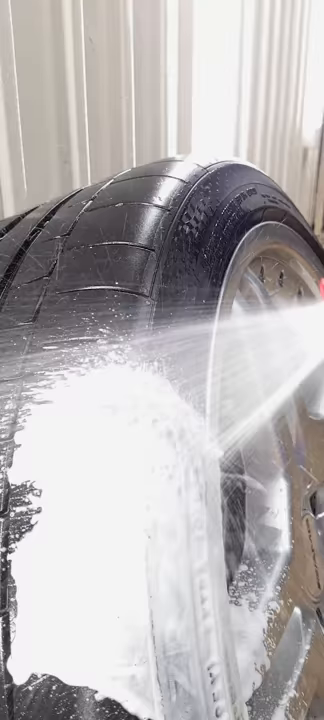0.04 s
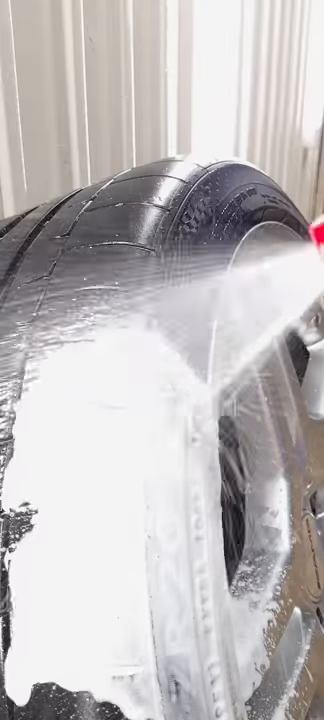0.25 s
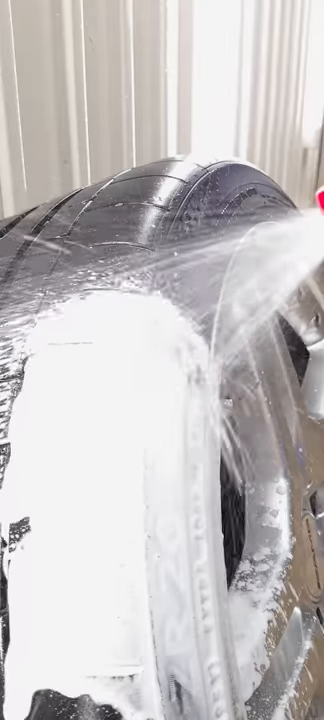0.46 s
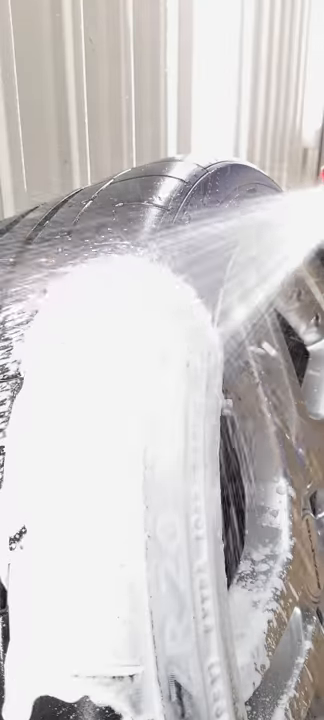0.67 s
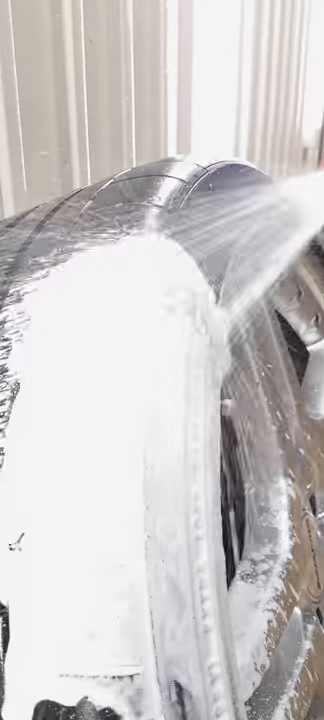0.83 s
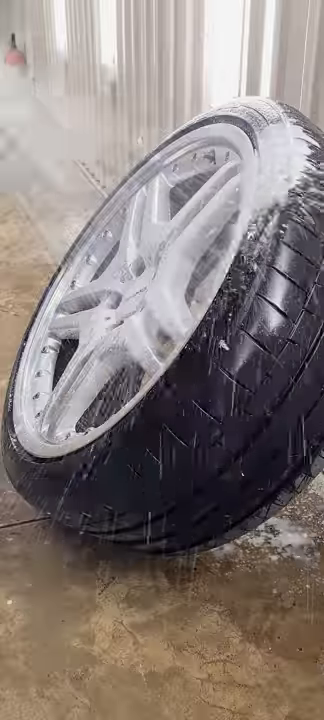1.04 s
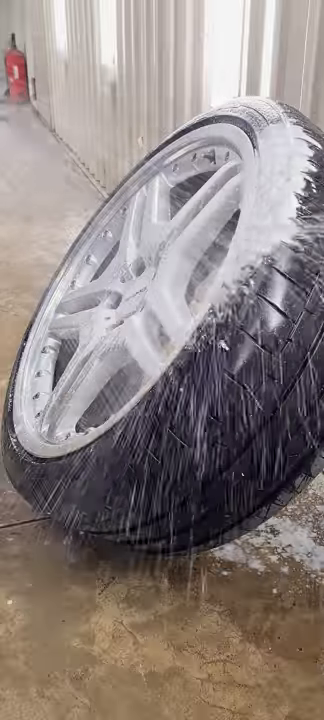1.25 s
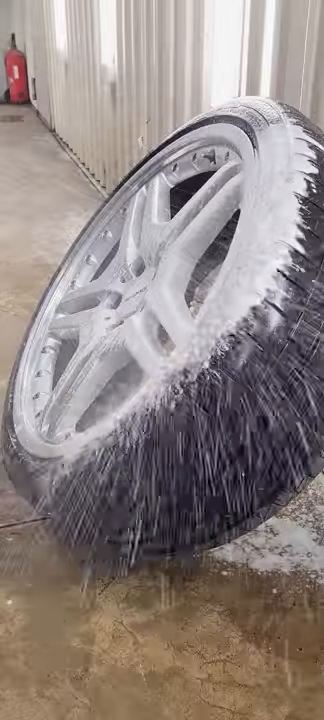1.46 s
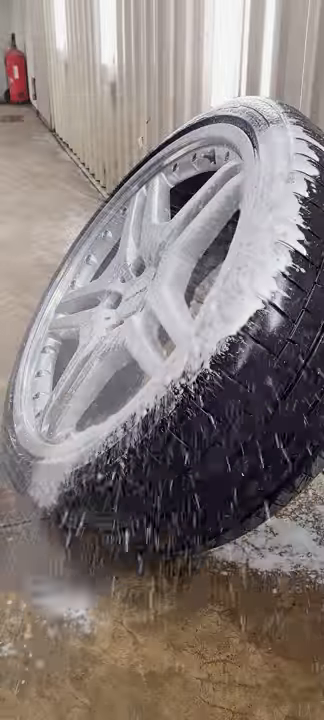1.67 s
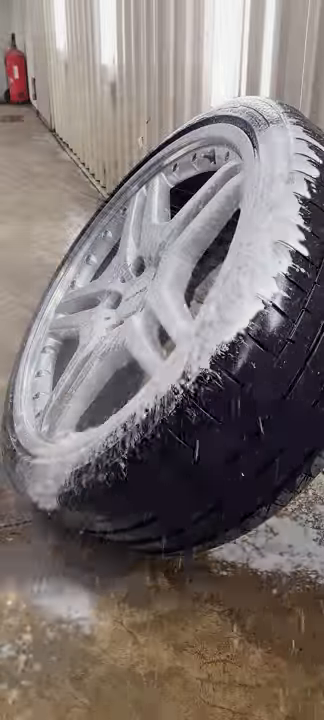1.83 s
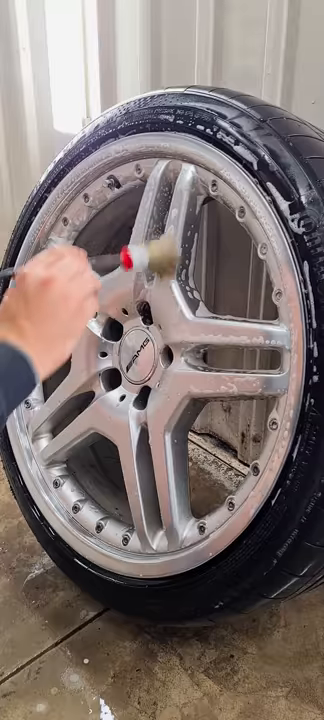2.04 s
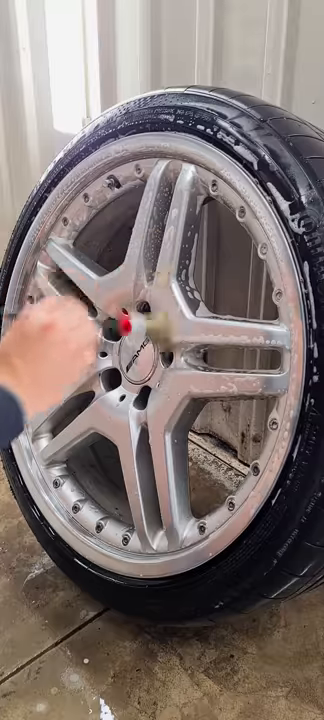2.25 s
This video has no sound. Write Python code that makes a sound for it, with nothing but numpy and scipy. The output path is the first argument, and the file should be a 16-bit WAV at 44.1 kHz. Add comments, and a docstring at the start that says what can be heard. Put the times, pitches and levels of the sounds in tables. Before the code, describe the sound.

A pressurised foam sprayer hisses onto a car wheel in a garage. After a faint hiss, the close jet starts at 0.1 seconds, sputtering and drumming on the tyre, with a sharp splash near 1 second. It then cuts to a smoother, more distant spray pattering on the rim, easing around 1.8 seconds. From 2 seconds a small brush quietly scrubs wet spokes. A faint low rumble lies underneath.

```python
"""A foam lance sprays a car wheel in a garage, in three short scenes joined by hard cuts.
After a faint hiss, the jet sputters close up: turbulence and droplets hiss, foam drums on the tyre,
and sliding reflections comb-filter the sound. From further off the jet then sweeps smoothly over
the rim and excites its resonances. Thick slugs of foam splash in both passes. Last, a small brush
scrubs the wet spokes over the low rumble that lies under all three scenes."""
import sys
import numpy as np
from scipy import signal
from scipy.fft import rfft, irfft
from scipy.io import wavfile
from scipy.ndimage import map_coordinates

SR = 44100
rng = np.random.default_rng(int(sys.argv[2]) if len(sys.argv) > 2 else 0)


def to_wav(sig):
    """Store sig (one row per channel, or 1-D mono) as 16-bit WAV at the path in sys.argv[1].

    Samples outside -1..1 are clipped; the rate is SR.
    """
    pcm = np.clip(np.atleast_2d(sig), -1, 1) * 32767
    pcm = np.round(pcm).astype(np.int16)
    wavfile.write(sys.argv[1], SR, pcm.T)  # frames by channels


N = 101429

TREAD_S, RIM_S, BRUSH_S = 0.1154, 1.071, 2.028  # where the scenes start
GARAGE_T60_S, WHEEL_T60_S = 0.12, 0.045  # decay of sound scattered by the walls and around the wheel


def undb(db):
    """Amplitude grows tenfold every 20 dB."""
    return 10 ** (np.asarray(db) / 20)


def unit(x):
    """Normalisation to unit RMS."""
    return x / np.sqrt(np.mean(x ** 2))


def clock():
    """Sample times in seconds."""
    return np.arange(N) / SR


def curve(rows, axis=1):
    """Linear interpolation of one column in time."""
    rows = np.array(rows)
    return np.interp(clock(), rows[:, 0], rows[:, axis])


def between(start_s, end_s, fade_s=0.0084):
    """A time window with short linear fades."""
    return np.clip((clock() - start_s) / fade_s + .5, 0, 1) * np.clip((end_s - clock()) / fade_s + .5, 0, 1)


def bell(middle_s, half_s):
    """A Gaussian swell as the jet passes a spot."""
    return np.exp(-((clock() - middle_s) / half_s) ** 2)


def slide(ends, span_s):
    """Accelerated motion between two values: the lance gathers speed through a pass."""
    return ends[0] + (ends[1] - ends[0]) * np.interp(clock(), span_s, (0, 1)) ** 1.5


def walk(rate_hz):
    """Smooth random fluctuation with a spread near 1."""
    return map_coordinates(rng.standard_normal(4096), [clock() * rate_hz], order=2, mode="wrap")


def colour(x, rows, axis=1):
    """Spectral shaping by gains interpolated over log frequency."""
    rows, hz = np.array(rows), np.fft.rfftfreq(2 * N, 1 / SR)
    gain_db = np.interp(np.log(hz + 1), np.log(rows[:, 0]), rows[:, axis])
    return irfft(rfft(x, 2 * N) * undb(gain_db))[..., :N]


def glide(x, ratio):
    """Resampling scales all frequencies by a moving ratio."""
    return map_coordinates(x, [np.cumsum(ratio)], order=5, mode="mirror")


def late(x, delay_ms):
    """Propagation delay, which may vary in time."""
    return map_coordinates(x, [np.arange(N) - delay_ms * SR / 1000], order=3, mode="mirror")


def ring(x, modes):
    """Modal superposition: damped resonances add with alternating sign."""
    return sum((-1) ** k * undb(db) * signal.lfilter(*signal.iirpeak(hz, hz / width, SR), x)
               for k, (hz, width, db) in enumerate(modes))


def nearby(x, right_lag_ms, echoes, span_s):
    """Comb filtering: direct sound and sliding reflections interfere at two microphone ports."""
    def port(direct, rows):
        reflected = sum(gain * late(direct, slide((start, end), span_s)) for start, end, gain in rows)
        return (direct + reflected) / np.sqrt(1 + sum(gain ** 2 for _, _, gain in rows))
    right = late(x, np.interp(clock(), span_s, right_lag_ms))
    return np.array([port(x, echoes[0]), port(right, echoes[1])])


def hollow(ports):
    """Interference with a very short reflection hollows the hiss at the tyre's shoulder."""
    gains = [peak * bell(middle_s=0.74, half_s=0.2) for peak in (0.08, 0.34)]
    return np.array([(x + g * late(x, delay_ms=0.38)) / np.hypot(1, g) for x, g in zip(ports, gains)])


def scatter(x, t60_s, count=5):
    """A diffuse field drifts as the source moves; the ports are coherent only in the bass."""
    t = np.arange(SR // 3) / SR
    tails = rng.standard_normal((count, 2, len(t))) * undb(-60 * t / t60_s)
    echoes = sum(signal.fftconvolve(late(x, 0.209 * walk(rate_hz=3))[None], tail, axes=1)[:, :N]
                 for tail in tails)
    mid, side = echoes / np.linalg.norm(tails)
    side = colour(side, [(200, -35), (700, 3), (1400, 0.5)])
    return np.array([mid + side, mid - side])


def spray(drops, spread_db, flutter_db, flutter_hz, drops_per_s=2500):
    """Turbulent noise plus shot noise of uneven impacts, fluttering as the stream breaks up."""
    sizes = rng.choice([-1, 1], N) * undb(spread_db * np.minimum(rng.exponential(size=N), 3.5))
    impacts = (rng.random(N) < drops_per_s / SR) * sizes
    stream = rng.standard_normal(N) + drops * unit(impacts)
    return unit(stream * undb(flutter_db * walk(flutter_hz)))


def cloud(spectrum):
    """Widely spread droplets give a hiss that is incoherent between the ports."""
    ports = [spray(drops=0.66, spread_db=2.0, flutter_db=-4.5, flutter_hz=310) for _ in range(2)]
    return np.array([unit(colour(port, spectrum)) for port in ports])


def background():
    """Shaped random noise: room air, a faint opening hiss and a rumble that sinks during the spraying."""
    # spectra of the three noises: frequency_hz, gain_db
    faint_spectrum = [(200, -11), (1000, -6), (2500, -0.5), (5500, 1.5), (8000, -1.5), (15000, 2.5)]
    rumble_spectrum = [(15, -2.5), (28, -5.5), (40, -2), (48, -8), (60, 4.5), (85, -5.5), (125, -17.5),
                       (200, -33), (600, -46)]
    air_spectrum = [(60, 14), (150, -14), (210, 2.5), (330, 2), (600, -3), (1500, -10.5), (4000, -20.5),
                    (15000, -40)]
    # envelopes of hiss and rumble: time_s, level_db
    faint_levels = [(0, -57), (.06, -63.5), (.11, -60)]
    rumble_levels = [(0, -60.5), (.1, -56), (.15, -63.5), (.8, -65), (1.3, -70), (1.75, -68.5), (2, -63),
                     (2.3, -63.5)]
    stereo_noise = lambda width: rng.standard_normal(N) + width * rng.standard_normal((2, N))
    faint = unit(colour(rng.standard_normal((2, N)), faint_spectrum)) * undb(curve(faint_levels))
    rumble = unit(colour(stereo_noise(0.099), rumble_spectrum)) * undb(curve(rumble_levels))
    air = unit(colour(stereo_noise(0.43), air_spectrum)) * undb(-69.5)
    return faint * (clock() < TREAD_S) + rumble + air


def brush():
    """Friction noise: wet bristles flick over the spokes, louder under more pressure."""
    # noise of the bristles: frequency_hz, gain_db
    spectrum = [(500, 6), (1200, -1.5), (3000, 1.5), (5300, -3.5), (8000, -7.5), (15000, -1)]
    # pressure on the spokes: time_s, relative_level_db
    scrub = [(2.03, -70), (2.055, -75.5), (2.1, -74.5), (2.125, -71.5), (2.15, -76), (2.18, -73),
             (2.194, -65), (2.21, -69), (2.235, -73.5), (2.3, -72)]
    flicks = spray(drops=0.81, spread_db=6, flutter_db=1.5, flutter_hz=200)
    bristles = unit(colour(flicks, spectrum)) * undb(curve(scrub) - 6)
    return (bristles + scatter(undb(8.5) * bristles, WHEEL_T60_S)) * (clock() > BRUSH_S)


def splashes(attack_s=0.002, decay_s=0.016):
    """Impact transients: each slug of foam bursts into noise that decays exponentially."""
    # slugs striking the wheel: start_s, level_db
    slugs = [(0.346, -45), (1.015, -33.5), (1.03, -39.5), (1.538, -39)]
    # noise of a splash: frequency_hz, gain_db
    spectrum = [(200, -42), (2600, -0.5), (4400, 4.5), (6000, -13), (12000, -9)]
    burst = lambda age: np.clip(age / attack_s, 0, 1) * np.exp(-np.abs(age) / decay_s)
    return cloud(spectrum) * sum(undb(db) * burst(clock() - start_s) for start_s, db in slugs)


def foam_on_rim():
    """At a distance the diffuse field dominates the hiss; drops excite the modes of rim and spokes."""
    # strength of the sweeping jet: time_s, relative_hiss_db, relative_patter_db
    sweep = [(1.08, -41, -58), (1.13, -39.5, -58), (1.25, -40.5, -57), (1.47, -39.5, -57),
             (1.6, -36.5, -60), (1.715, -40.5, -61.5), (1.76, -46.5, -67), (1.83, -46, -64.5),
             (1.885, -48.5, -66.5), (1.96, -44.5, -62), (2.024, -39.5, -54)]
    # hiss on the rim: frequency_hz, gain_db
    spectrum = [(600, -23), (1250, -8), (1600, -3), (2600, -1), (3700, 1), (5000, -1.5), (9000, -3.5),
                (12000, 3), (15000, -0.5)]
    # resonances of the wheel: frequency_hz, bandwidth_hz, gain_db
    rim_modes = [(296, 115, -11.5), (432, 113, -5), (725, 240, -4.5), (927, 64, 3), (1184, 61, -1)]
    spoke_modes = [(1555, 47, 9), (1830, 63, -10)]
    # near reflections, left port then right: start_delay_ms, end_delay_ms, gain
    echoes = ([(3.45, 2.52, 0.42), (1.02, 1.03, 0.2)], [(2.83, 2.25, 0.65), (1.22, 1.4, 0.15)])
    span_s = (RIM_S, BRUSH_S)
    hiss_gain = undb(curve(sweep) - 1.5)
    hiss = colour(spray(drops=0.85, spread_db=6.5, flutter_db=0.4, flutter_hz=301.6), spectrum)
    hiss = unit(hiss) * hiss_gain
    patter = ring(spray(drops=0.87, spread_db=3.5, flutter_db=2.0, flutter_hz=57.55), rim_modes)
    patter = glide(patter, slide((1.0, 0.89), span_s))  # the ring sinks as the jet moves on
    patter = unit(patter) * undb(curve(sweep, axis=2) + 0.5)
    spokes = ring(spray(drops=0.67, spread_db=6, flutter_db=4, flutter_hz=55.5), spoke_modes)
    spokes = unit(spokes) * undb(-57) * bell(middle_s=1.612, half_s=0.12)
    spatter = scatter(undb(-4) * hiss, WHEEL_T60_S)
    walls = scatter(undb(-1) * hiss + undb(-3) * patter, GARAGE_T60_S)
    droplets = cloud(spectrum) * hiss_gain
    direct = nearby(hiss + patter, (0.277, 0.11), echoes, span_s)
    return (direct + spokes + spatter + walls + droplets) * between(*span_s)


def foam_on_tread():
    """Surges modulate the turbulent jet, its wash and its mist; blobs of foam drive the tyre's modes."""
    # strength of the sputtering jet: time_s, relative_level_db
    sputter = [(0.118, -41.5), (0.15, -35.5), (0.164, -39.0), (0.192, -35.5), (0.21, -42.0), (0.25, -34.0),
               (0.286, -39.0), (0.316, -34.5), (0.343, -43.0), (0.35, -29.5), (0.368, -37.0), (0.38, -33.0),
               (0.41, -39.5), (0.422, -33.5), (0.452, -39.0), (0.46, -32.5), (0.482, -36.5), (0.49, -31.5),
               (0.524, -42.0), (0.54, -34.5), (0.544, -39.0), (0.562, -31.8), (0.624, -38.5),
               (0.628, -35.5), (0.676, -30.0), (0.686, -37.0), (0.704, -28.0), (0.73, -32.0), (0.75, -37.0),
               (0.794, -33.0), (0.824, -40.0), (0.832, -34.5), (0.872, -41.0), (0.878, -35.0),
               (0.918, -38.0), (0.93, -33.5), (0.954, -39.5), (0.98, -36.0), (1.01, -40.0), (1.022, -37.0),
               (1.068, -42.0)]
    # spectra of the jet, the foam washing over rubber and the fine mist: frequency_hz, gain_db
    jet_spectrum = [(150, -34), (1000, -14.5), (3000, -5), (4000, -1.5), (4600, 5), (5200, 4), (6500, -4),
                    (7400, -2.5), (9500, -9.5), (15000, -8.5)]
    wash_spectrum = [(600, -19), (1100, -4.5), (1700, 1), (2300, 2), (3200, 2), (3900, -1), (4800, -19),
                     (7000, -35)]
    mist_spectrum = [(3000, -18), (6500, -0.5), (9500, -5), (12500, 3.5), (15500, 2)]
    # resonances of the tyre: frequency_hz, bandwidth_hz, gain_db
    tyre_modes = [(276, 65, -4.5), (508, 250, -5), (673, 214, -4), (917, 105, -0.5)]
    # near reflections, left port then right: start_delay_ms, end_delay_ms, gain
    echoes = ([(1.62, 1.37, 0.85), (1.2, 1.2, 0.1)], [(1.47, 1.26, 0.75), (0.874, 0.8, 0.2),
              (2.33, 2.28, 0.12)])
    span_s, right_lag_ms = (TREAD_S, RIM_S), (0.22, 0.26)
    surge_db = curve(sputter)
    swing_db = surge_db + 36  # swing about the mean; wash and mist follow about half of it
    wash_gain, mist_gain = undb(-43 + 0.5 * swing_db), undb(-38 + 0.47 * swing_db)
    jet = colour(spray(drops=0.51, spread_db=3.0, flutter_db=2.5, flutter_hz=403), jet_spectrum)
    jet = unit(glide(jet, slide((0.94, 1.09), span_s))) * undb(surge_db - 7)
    wash = colour(spray(drops=0.86, spread_db=2.5, flutter_db=0.5, flutter_hz=199.8), wash_spectrum)
    wash = unit(wash) * wash_gain
    mist = colour(spray(drops=0.64, spread_db=6, flutter_db=1.1, flutter_hz=390), mist_spectrum)
    mist = unit(mist) * mist_gain
    drum = ring(spray(drops=1.13, spread_db=4.5, flutter_db=0.7, flutter_hz=70.2), tyre_modes)
    drum = unit(drum) * undb(-46 - 2.5 * clock())
    drum = signal.sosfilt(signal.butter(2, 200, "high", fs=SR, output="sos"), drum)
    spatter = scatter(undb(-8.5) * jet + undb(-1.5) * mist, WHEEL_T60_S)
    droplets = cloud(mist_spectrum) * mist_gain
    walls = scatter(undb(-7) * (jet + drum + wash) + undb(-3.5) * mist, GARAGE_T60_S)
    hiss = hollow(nearby(jet + wash + mist, right_lag_ms, echoes, span_s) + spatter + droplets)
    return (hiss + nearby(drum, right_lag_ms, echoes, span_s) + walls) * between(*span_s)


def scene():
    """Superposition of all sources at the two ports."""
    return foam_on_tread() + foam_on_rim() + splashes() + brush() + background()


def record(dry, cutoff_hz=15750):
    """Each microphone port resonates near 5 kHz; a steep low-pass limits the band."""
    # response of the ports: frequency_hz, left_db, right_db
    response = [(2030, 0.5, 2), (3020, 3, 3), (3340, -3, 0.5), (4520, 5.5, 8), (5670, 5.5, 9.5),
                (6330, 4.5, 0), (7550, -2, 3), (8100, -5, 3), (9050, -1, -1.5), (9800, -1.5, 1),
                (11600, -3, 1), (13700, -9.5, 0), (15900, -5, -7)]
    ports = np.array([colour(dry[0], response, axis=1), colour(dry[1], response, axis=2)])
    return signal.sosfilt(signal.ellip(12, .1, 80, cutoff_hz, fs=SR, output="sos"), ports)


dry = scene()
out = record(dry)
to_wav(out)
```